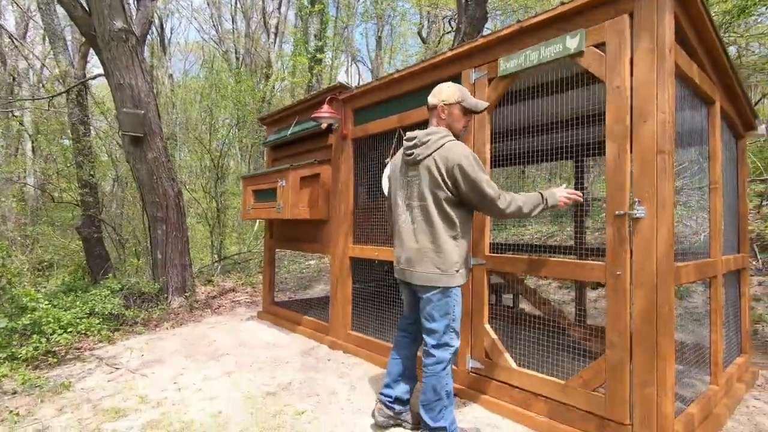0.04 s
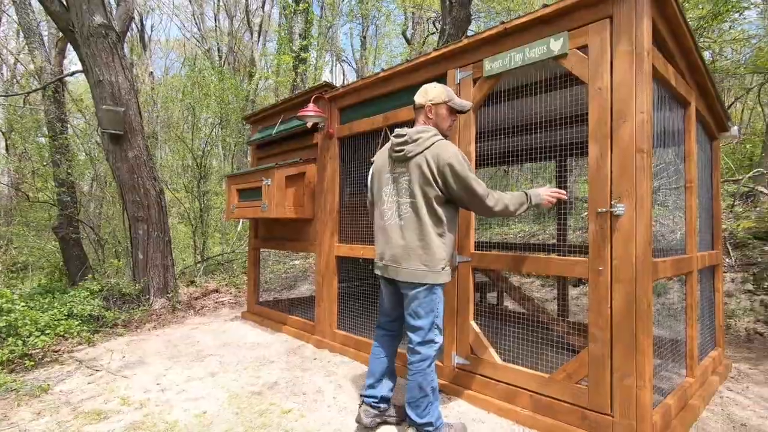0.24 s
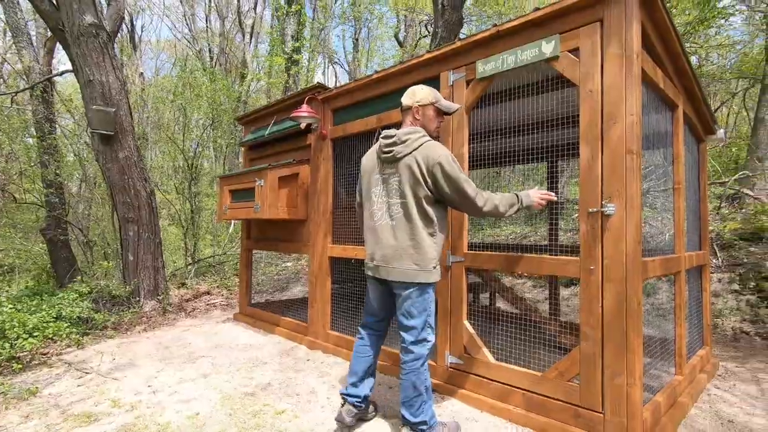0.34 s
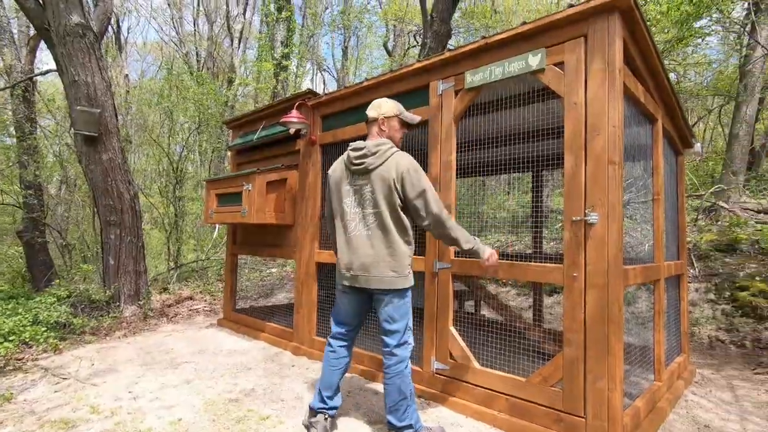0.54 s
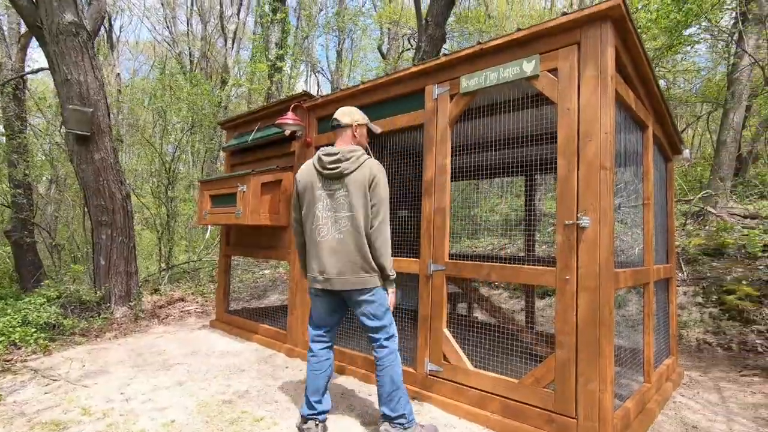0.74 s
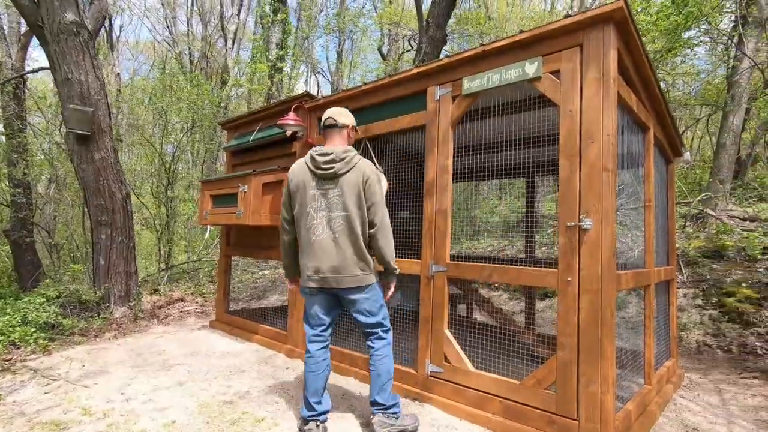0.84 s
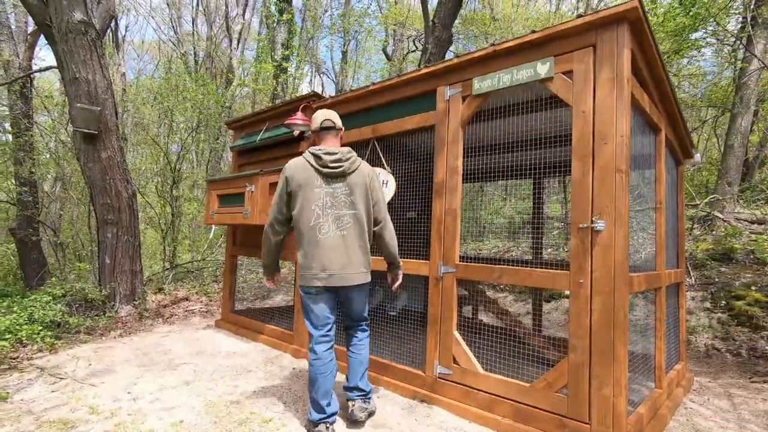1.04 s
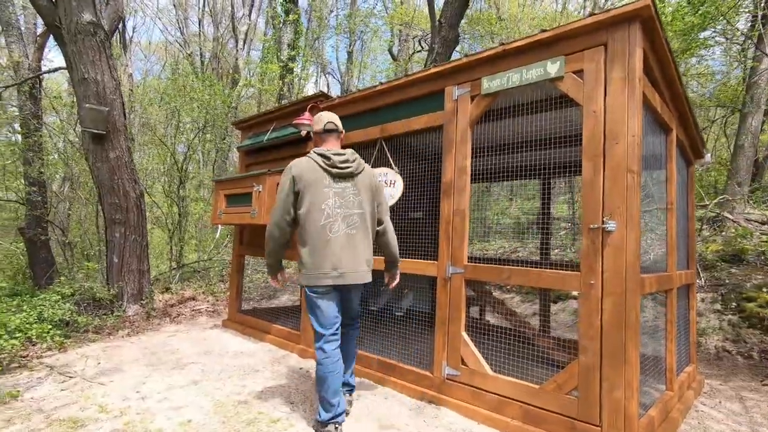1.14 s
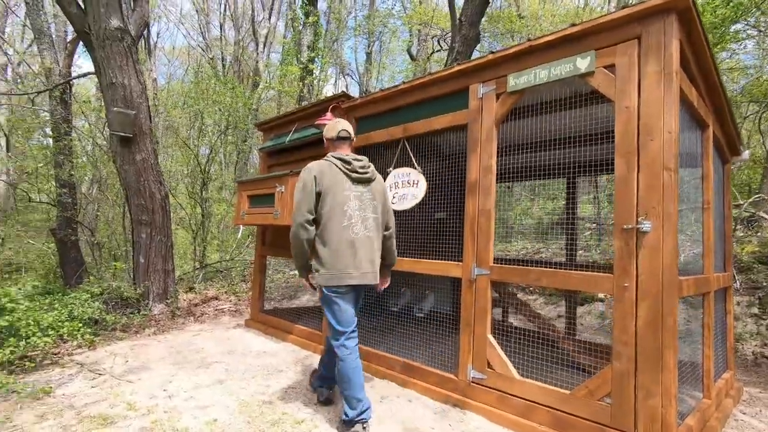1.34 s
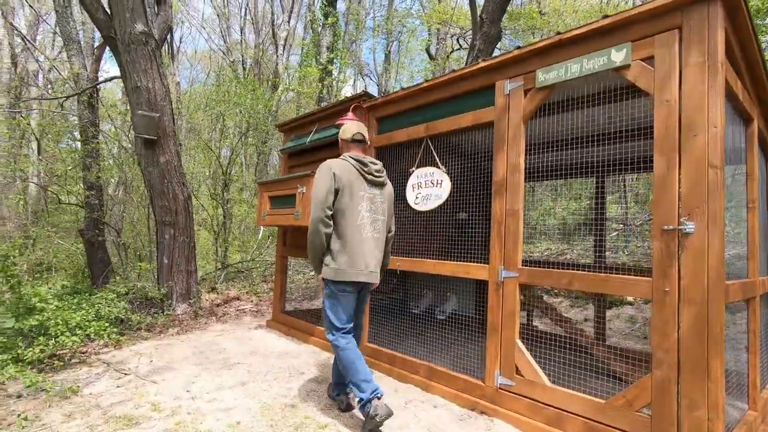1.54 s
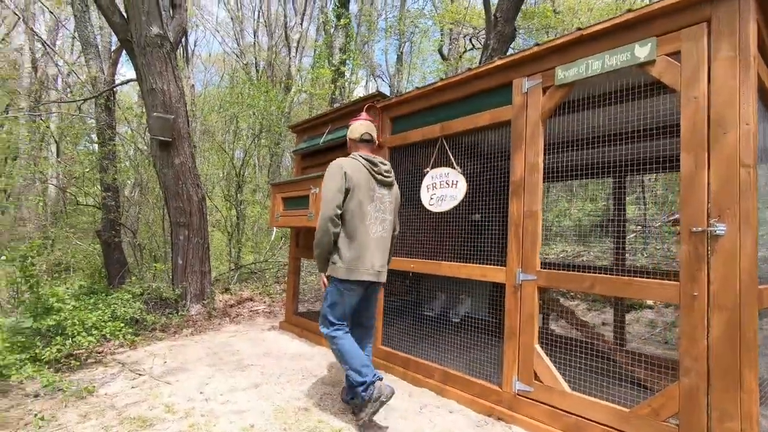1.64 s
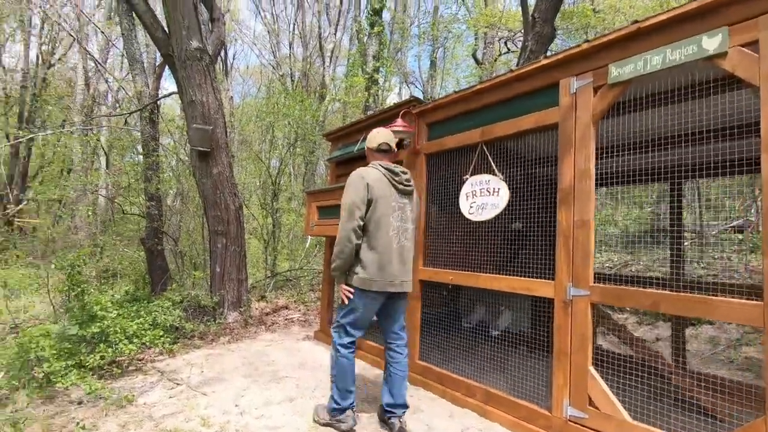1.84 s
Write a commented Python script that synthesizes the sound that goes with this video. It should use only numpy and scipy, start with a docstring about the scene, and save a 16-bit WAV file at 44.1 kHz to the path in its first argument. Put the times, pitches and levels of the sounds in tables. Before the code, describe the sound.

A wooden chicken coop door slams shut, its metal latch and wire mesh rattling in weakening bounces. A few soft footsteps follow on dirt, while small birds chirp faintly in the woods and light wind touches the microphone.

```python
"""Light wind rumbles on the microphone, the woods hiss softly and a small bird whistles. At about 0.2 s
the wooden door of a chicken coop slams: its frame booms, its steel latch rings, and its wire mesh
clatters and shivers. The latch chatters on in wider, weaker bounces until about 1 s. As the last
bounces fade, someone walks off over dirt, and more short bird calls echo among the trees."""
import sys
import numpy as np
from scipy import signal
from scipy.fft import rfft, irfft
from scipy.io import wavfile
from scipy.ndimage import uniform_filter1d

SR = 44100
rng = np.random.default_rng(int(sys.argv[2]) if len(sys.argv) > 2 else 0)


def pcm_store(signal):
    """Save signal as 16-bit PCM."""
    levels = np.round(np.clip(np.atleast_2d(signal), -1, 1) * 32767)
    wavfile.write(sys.argv[1], SR, levels.astype(np.int16).T)


N = 83790

# Each hit of the door and latch: start_s, wood_db, low_latch_db, high_latch_db, rise_s, bolt_hz
DOOR_HITS = [(0.2159, -18, -20.5, -39, 0.00068, 3470), (0.231, -21.5, -25, -23, 0.0011, 3350),
             (0.2382, -14.5, -12.5, -7.5, 0.0013, 3564), (0.2668, -21, -23.5, -11, 0.004, 3440),
             (0.3028, -34.5, -19.5, -9, 0.0022, 3430), (0.3459, -30, -25, -21.5, 0.0022, 3290),
             (0.386, -29, -40, -18, 0.0072, 2960), (0.436, -39, -25, -19.5, 0.0075, 3240),
             (0.494, -42.5, -35.5, -29.5, 0.0024, 3326), (0.5353, -35, -28, -25, 0.0054, 3254),
             (0.594, -38, -45.5, -38, 0.0029, 3215), (0.657, -45, -58, -46, 0.0037, 3297),
             (0.820, -42, -50.5, -36, 0.013, 3220), (0.913, -55.5, -60, -46.5, 0.0052, 3290),
             (0.9864, -49, -54.5, -43, 0.0064, 3305)]
# Notes of the parts that ring: pitch_hz, level_db, ring_s (the time to fade by 60 dB)
LATCH_NOTES = [(2056, -0.5, 0.027), (5150, -9.5, 0.02), (6210, 2.5, 0.039), (7120, -5.5, 0.046)]
FRAME_NOTES = [(179.4, -2, 0.2), (224, -5.5, 0.78), (257, -4.5, 0.55), (301.1, -6.5, 0.25),
               (746.5, 4.5, 0.11), (995, -2, 0.17)]
CATCH_PLATE_NOTES = [(2955, -10, 0.07), (3893, -3, 0.062), (7000, -3.5, 0.049)]
# Tone (how strong the lows and highs are) of each door noise: pitch_hz, level_db
KNOCK_TONE = [(60, -9), (200, 1), (480, -9), (800, 4.5), (1400, -0.5), (2100, 7), (3300, -2), (6000, -2.5),
              (12000, -36)]
LOW_CRACK_TONE = [(500, -5), (1500, -17.5), (3000, -1), (4400, 0), (4900, -20.5), (13000, -39)]
HIGH_CRACK_TONE = [(1000, -42.5), (4700, -10.5), (6400, -9), (7100, 0), (8300, -26.5), (16000, -66.5)]
CLATTER_TONE = [(500, -10), (2400, -12.5), (6000, -10), (9000, -39)]
SHIVER_TONE = [(800, 0.5), (2200, -9), (4000, -13.5), (7300, -14)]
# How long the mesh and coop keep shivering: pitch_hz, ring_s
SHIVER_TIMES = [(200, 2.8), (700, 0.62), (3000, 0.9), (14000, 0.26)]
# Feet landing on dirt: start_s, scuff_db, thud_db, thud_rise_s
FOOTSTEPS = [(0.853, -38, -44.5, 0.024), (1.414, -42.5, -51, 0.0068), (1.71, -41, -59, 0.006),
             (1.775, -67, -23, 0.0091)]
# Tone of the two parts of a step: pitch_hz, level_db
SCUFF_TONE = [(100, 12.5), (1700, 7.5), (6000, -6), (9500, -46)]
THUD_TONE = [(35, 11.5), (260, -8), (480, -31), (16000, -97)]
# Bird whistles: start_s, length_s, first_hz, last_hz, level_db
BIRD_NOTES = [(0.055, 0.048, 3840, 3720, -53.5), (0.1, 0.057, 3780, 4655, -46.5),
              (0.136, 0.041, 4580, 4680, -50.5), (0.39, 0.03, 4350, 4600, -58),
              (1.004, 0.032, 4750, 3940, -52.5), (1.113, 0.031, 4750, 3550, -50),
              (1.229, 0.029, 4950, 3420, -46.5), (1.332, 0.014, 5430, 3020, -51),
              (1.447, 0.035, 5610, 6850, -47), (1.484, 0.022, 5400, 3300, -46),
              (1.589, 0.031, 4760, 3890, -54)]
# Tone of the wind and of the air in the trees: pitch_hz, level_db
WIND_TONE = [(35, 0), (65, -5), (220, -16.5), (400, -31), (16000, -100)]
AIR_TONE = [(300, 3), (520, -2), (1100, 3.5), (2600, -7.5), (6600, -13), (8600, -28.5), (12300, -41.5),
            (16000, -78)]
# How the wind and the air swell and sink: time_s, level_db
WIND_SWELLS = [(0, -34), (.16, -31), (.24, -32), (.5, -32), (.9, -36.5), (1.15, -35.5), (1.36, -45.5),
               (1.41, -30.5), (1.49, -32.5), (1.62, -42), (1.9, -36)]
AIR_SWELLS = [(0, -48.5), (1.3, -48.5), (1.45, -45), (1.9, -48.5)]
# How much louder the microphone's left side is: pitch_hz, left_minus_right_db
MIC_BALANCE = [(200, -0.5), (650, -5.5), (1100, 1), (5900, -3), (7600, 0)]
# How far ahead the wave is on the left side: pitch_hz, lead_radians
MIC_PHASE = [(330, 1.41), (750, 2), (2000, 1.35), (3600, 0.21), (6000, 1)]

HARD_HIT_DB, CRACK_GROWTH = -20, 0.3  # a hard hit's level; extra dB of crack per dB above it
CRACK_FADE_S, KNOCK_FADE_S, CLATTER_FADE_S = 0.0016, 0.0096, 0.021
LATCH_DB, FRAME_DB, CLATTER_DB = -5.5, -15, -15.5
LATCH_SPLIT_HZ = 4600  # divides the low latch notes from the high ones
BOLT_DB, BOLT_RING_S = 3, 0.062
SEAT_DETUNE = 0.014  # share by which the pitch strays as the latch shifts in its seat
METAL_TO_MESH_DB = -13
BIRD_ECHO_DB, BIRD_ECHO_S = -2.5, 0.55
ALIKE = 0.68  # how alike left and right are, from 0 (unrelated) to 1 (the same)


def door():
    """The door slams and bounces, and each hit sets the mesh and the coop shivering."""
    direct, shiver = np.zeros((2, 2, N))
    for start_s, *hit in DOOR_HITS:
        impact, metal = door_hit(*hit)
        add(direct, start_s, impact + metal)
        shake = impact.mean(0) + amp(METAL_TO_MESH_DB) * metal
        add(shiver, start_s, signal.fftconvolve(shake[None], tail(SHIVER_TIMES, alike=0.87), axes=1))
    return direct + colour(shiver, SHIVER_TONE)


def door_hit(wood_db, low_db, high_db, rise_s, bolt_hz):
    """One hit builds up, cracks and shakes the wires. Returns the impact and the metal's ring."""
    size = 2 ** 15
    t = np.arange(size) / SR
    rise = np.minimum(t / rise_s, 1)
    since_peak = np.maximum(t - rise_s, 0)
    force_db = low_db - HARD_HIT_DB
    crack = amp(low_db) * noise(LOW_CRACK_TONE, size) + amp(high_db) * noise(HIGH_CRACK_TONE, size)
    crack *= amp(CRACK_GROWTH * force_db) * np.exp(-since_peak / CRACK_FADE_S)
    clatter = noise(CLATTER_TONE, size, grains=grit(size))
    clatter *= amp((low_db + high_db) / 2 + CLATTER_DB) * np.exp(-since_peak / CLATTER_FADE_S)
    knock = noise(KNOCK_TONE, size) * np.exp(-since_peak / KNOCK_FADE_S)
    boom = amp(FRAME_DB) * ring(FRAME_NOTES, t).sum(0)
    impact = crack + clatter + amp(wood_db) * (knock + boom)
    # The bolt's own note depends on where it lands in its seat.
    notes = np.array(LATCH_NOTES + [(bolt_hz, BOLT_DB, BOLT_RING_S)])
    strike_db = np.where(notes[:, 0] < LATCH_SPLIT_HZ, low_db, high_db)
    latch = amp(strike_db + LATCH_DB - CRACK_GROWTH * force_db) @ ring(notes, t, SEAT_DETUNE)
    # The catch plate only stands out on hard hits.
    catch_plate = amp(low_db + force_db) * ring(CATCH_PLATE_NOTES, t).sum(0)
    return rise * impact, rise * (latch + catch_plate)


def ring(notes, t, detune=0):
    """A struck part rings with fading notes, one row each, a little differently every time."""
    hz, db, ring_s = np.transpose(notes)[:, :, None]
    hz = hz * (1 + detune * rng.standard_normal(hz.shape))
    cycles = hz * t + rng.random(hz.shape)
    strength = amp(db - 0.5 * rng.standard_normal(hz.shape))
    return strength * np.exp(-np.log(1000) * t / ring_s) * np.sin(2 * np.pi * cycles)


def footsteps():
    """Soles scuff the dry dirt and thud as the weight comes down."""
    size = 2 ** 13
    t = np.arange(size) / SR
    out = np.zeros((2, N))
    for start_s, scuff_db, thud_db, thud_rise_s in FOOTSTEPS:
        age = t / thud_rise_s
        press = (2 * age) ** 2 * np.exp(2 - 4 * age)  # peaks before the weight does
        weight = age * np.exp(1 - age)
        scuff = amp(scuff_db) * press * noise(SCUFF_TONE, size, grains=grit(size))
        thud = amp(thud_db) * weight * noise(THUD_TONE, size)
        add(out, start_s, scuff + thud)
    return out


def birds():
    """Small birds sing thin, sliding whistles, and the trees echo them."""
    calls = np.zeros((2, N))
    for start_s, length_s, first_hz, last_hz, db in BIRD_NOTES:
        progress = np.arange(0, length_s, 1 / SR) / length_s
        arch = np.sin(np.pi * progress)
        slide_hz = last_hz - first_hz
        hz = first_hz + slide_hz * progress - 0.152 * abs(slide_hz) * arch  # sags in the middle
        add(calls, start_s, amp(db) * np.sqrt(arch) * np.sin(2 * np.pi * np.cumsum(hz) / SR))
    echo = signal.fftconvolve(calls, tail([(4000, BIRD_ECHO_S)]), axes=1)[:, :N]
    return calls + amp(BIRD_ECHO_DB) * echo


def wind():
    """Puffs of wind rumble on the microphone, 7 dB louder on the right."""
    return noise(WIND_TONE, N, alike=0.11) * swell(WIND_SWELLS) * amp([[-3.5], [3.5]])


def air():
    """Air hisses softly in the trees."""
    return noise(AIR_TONE, N) * swell(AIR_SWELLS)


def microphone(sound):
    """The two sides pick up each pitch with a different strength and timing."""
    hz = np.fft.rfftfreq(N, 1 / SR)
    sides = np.array([[0.5], [-0.5]])
    balance = amp(sides * look_up(MIC_BALANCE, hz))
    timing = np.exp(1j * sides * look_up(MIC_PHASE, hz))
    return irfft(rfft(sound) * balance * timing, N)


def tail(ring_times, alike=ALIKE):
    """One second of dense ringing in which each pitch fades at the speed given for it."""
    hz, t, bands = signal.stft(stereo_hiss(SR, alike), SR, nperseg=256)
    fade_rate = np.log(1000) / look_up(ring_times, hz)[:, None]
    bands = bands * np.exp(-fade_rate * t) * np.sqrt(2 * fade_rate / SR)  # longer rings start softer
    return signal.istft(bands, SR, nperseg=256)[1][:, :SR]


def grit(size, grain_s=0.0012, uneven_db=3.5):
    """A jumpy volume that breaks a noise into grains."""
    jitter = uniform_filter1d(rng.standard_normal(size), round(grain_s * SR))
    return unit(amp(uneven_db * unit(jitter)))


def noise(tone, size, alike=ALIKE, grains=1):
    """Stereo noise with a given tone, smooth or grainy."""
    return unit(colour(grains * stereo_hiss(size, alike), tone))


def stereo_hiss(size, alike):
    """White noise that is partly the same on the left and right."""
    left, other = rng.standard_normal((2, size))
    return np.array([left, alike * left + np.sqrt(1 - alike ** 2) * other])


def colour(sound, tone):
    """Turns each pitch up or down to follow a tone table."""
    size = sound.shape[-1]
    hz = np.fft.rfftfreq(size, 1 / SR)
    return irfft(rfft(sound) * amp(look_up(tone, hz)), size)


def look_up(table, hz):
    """Reads between a table's rows, giving each octave about equal room."""
    pitches, values = np.transpose(table)
    return np.interp(np.log(hz + 1), np.log(pitches + 1), values)


def swell(table):
    """A volume curve through rows of time_s, level_db."""
    return amp(np.interp(np.arange(N) / SR, *np.transpose(table)))


def add(mix, start_s, sound):
    """Mixes a sound in at its start time."""
    part = mix[:, round(start_s * SR):][:, :sound.shape[-1]]
    part += sound[..., :part.shape[1]]


def amp(db):
    """Turns decibels into a multiplier."""
    return 10 ** (np.asarray(db) / 20)


def unit(x):
    """Scales a signal to an average (rms) strength of 1."""
    return x / np.sqrt(np.mean(x ** 2) + 1e-20)


def scene():
    """Door, steps, birds and air reach the microphone while wind blows on it."""
    return microphone(door() + footsteps() + birds() + air()) + wind()


def record(dry):
    """Flattens any peak that is too loud, then cuts the highest treble."""
    treble_cut = signal.firwin(255, 16600, window=("kaiser", 9), fs=SR)
    return signal.oaconvolve(np.clip(dry, -1, 1), treble_cut[None], "same")


dry = scene()
out = record(dry)
pcm_store(out)
```